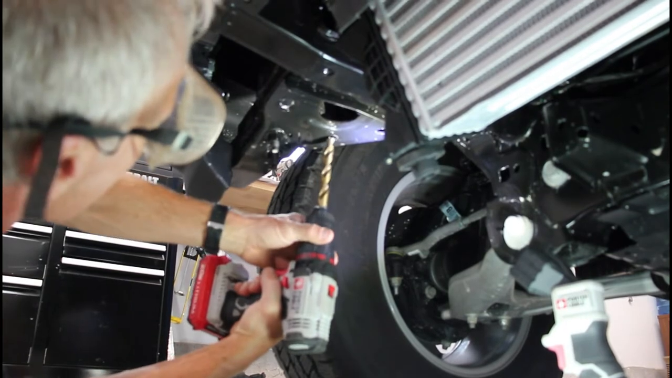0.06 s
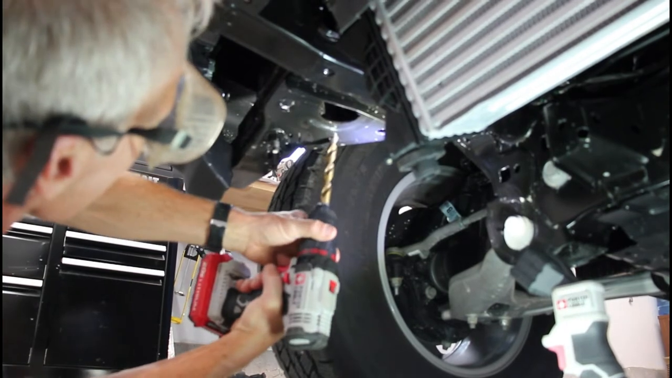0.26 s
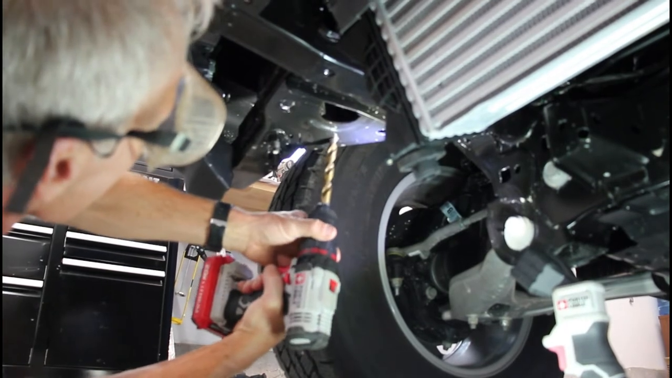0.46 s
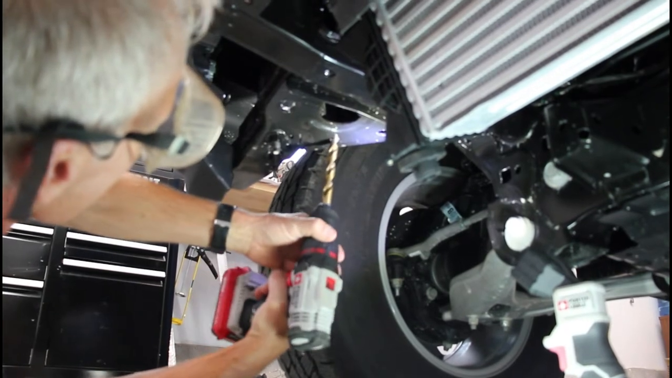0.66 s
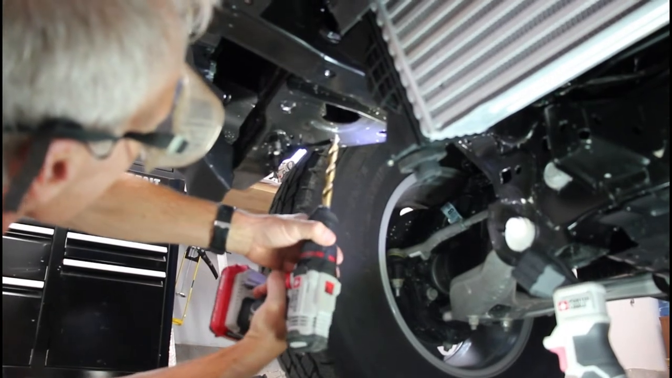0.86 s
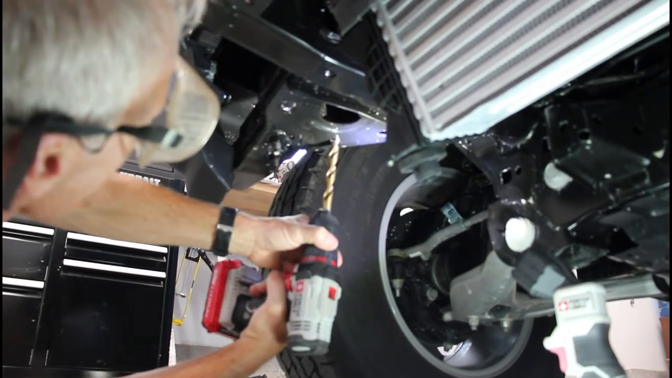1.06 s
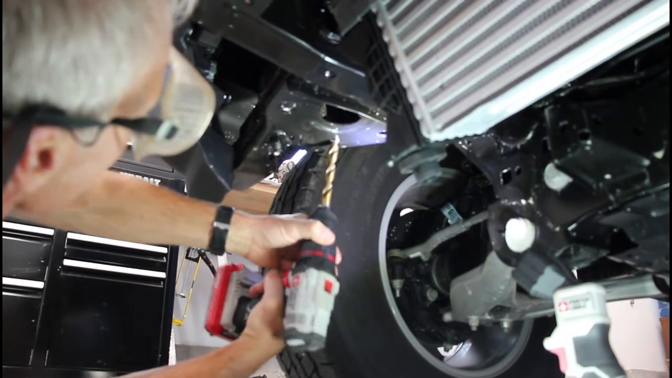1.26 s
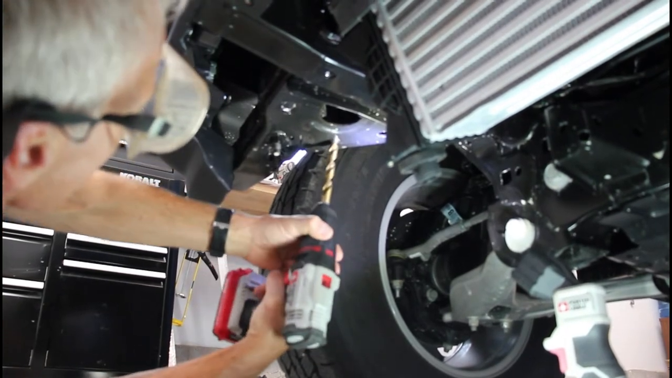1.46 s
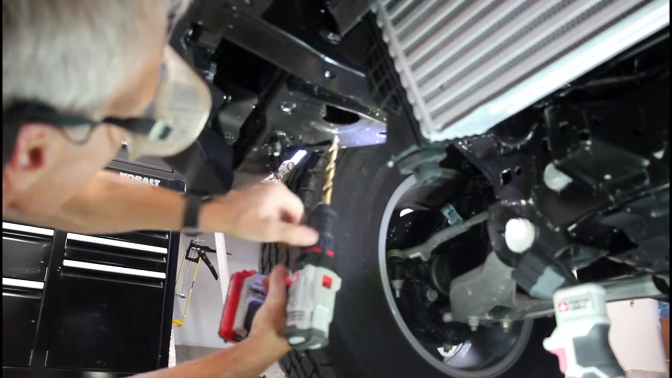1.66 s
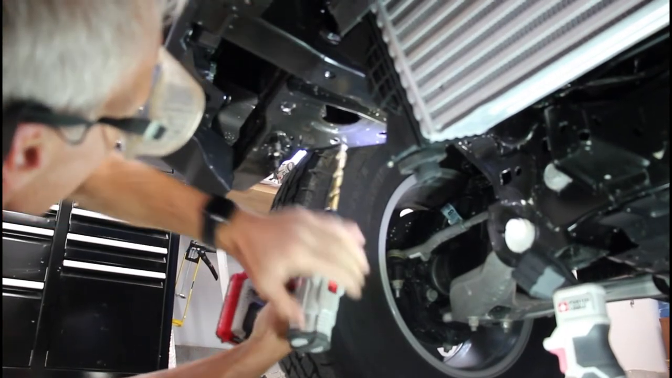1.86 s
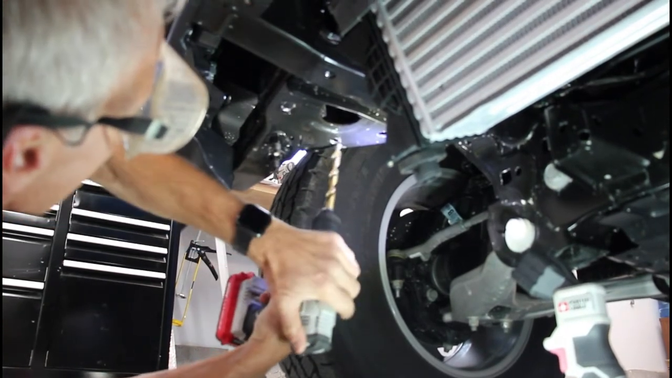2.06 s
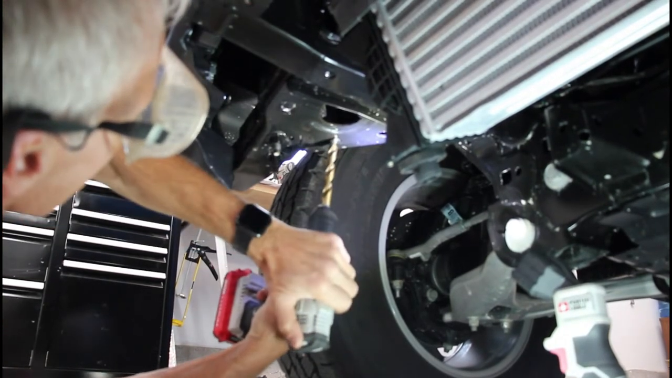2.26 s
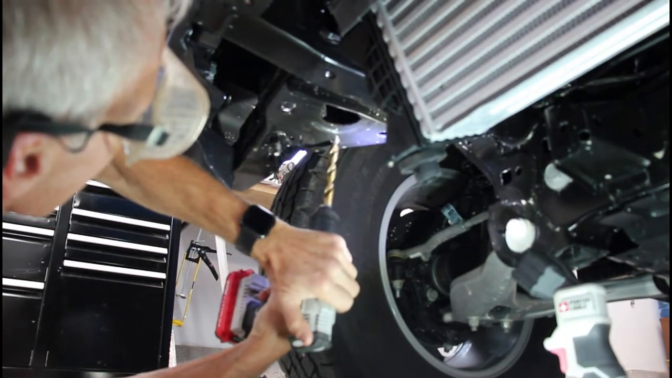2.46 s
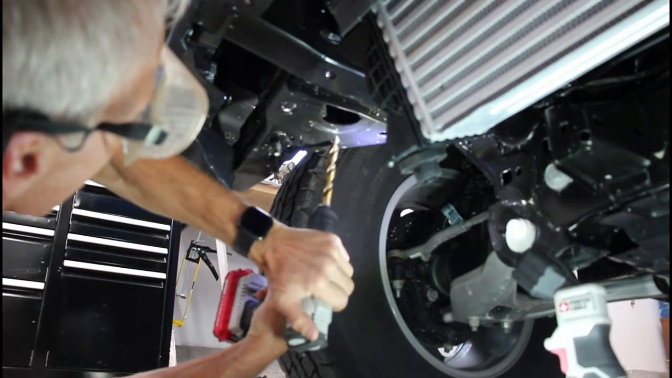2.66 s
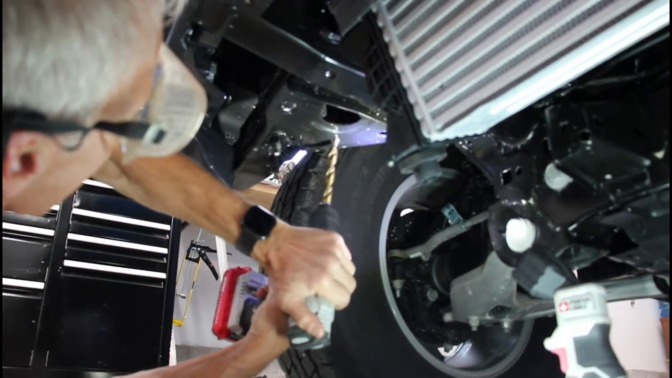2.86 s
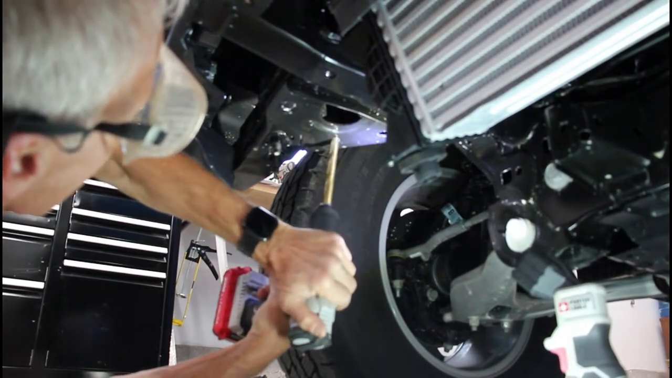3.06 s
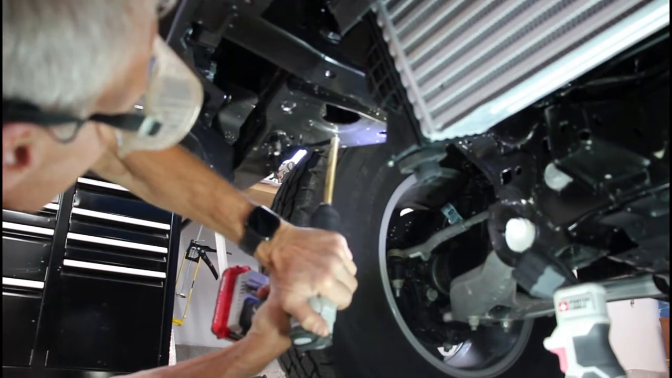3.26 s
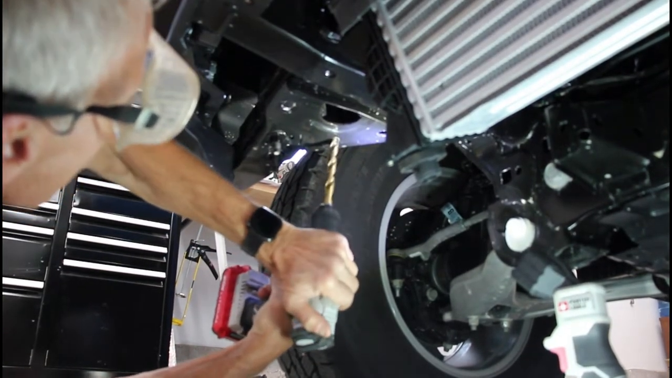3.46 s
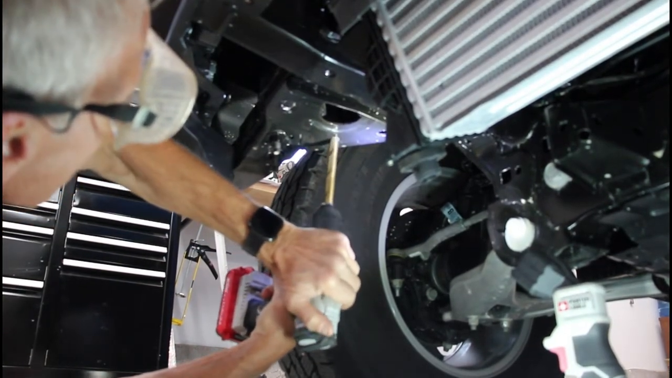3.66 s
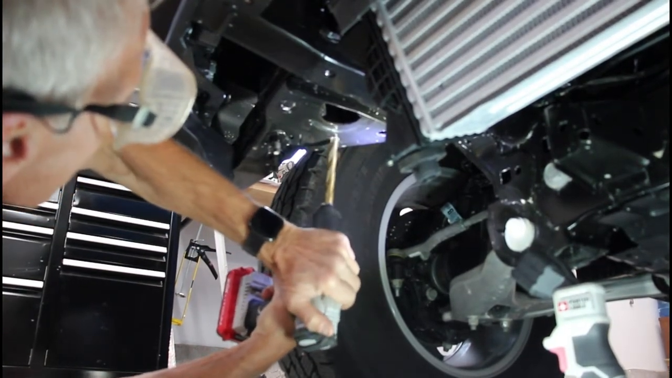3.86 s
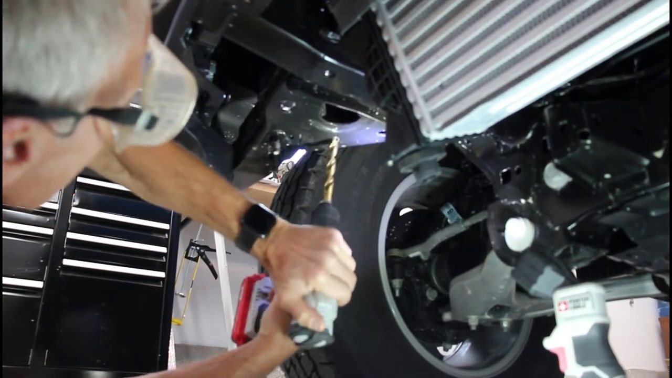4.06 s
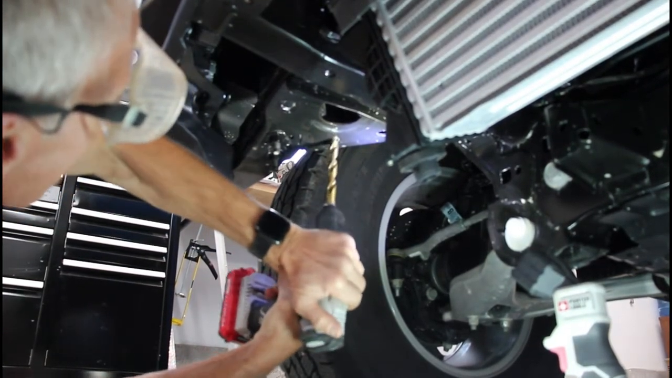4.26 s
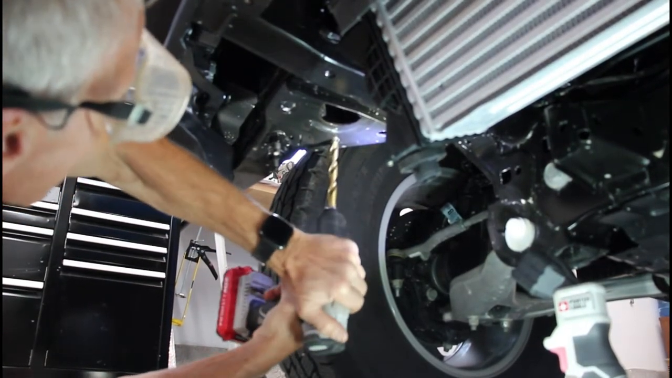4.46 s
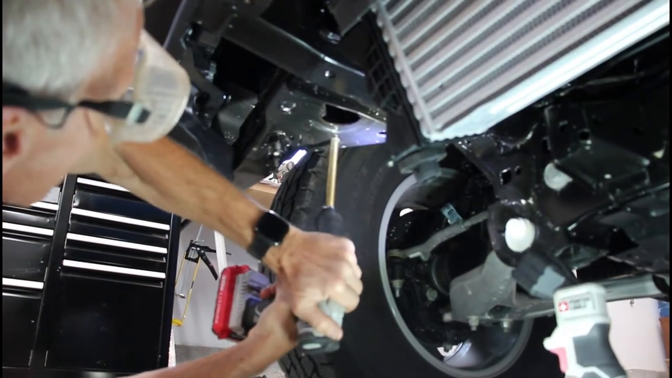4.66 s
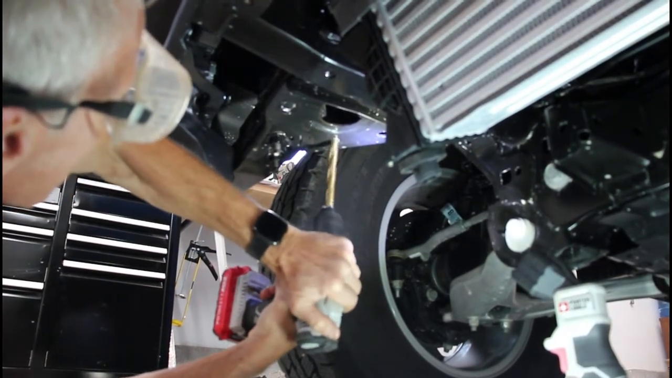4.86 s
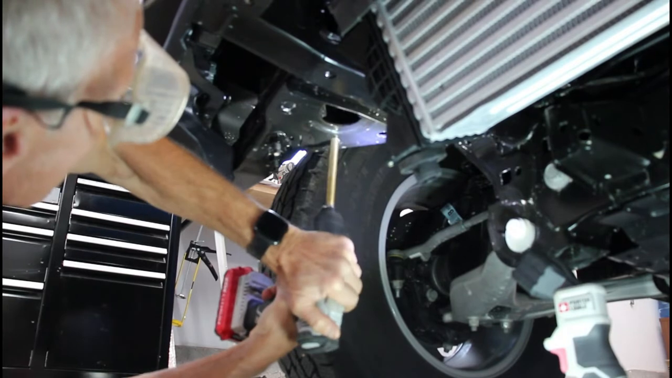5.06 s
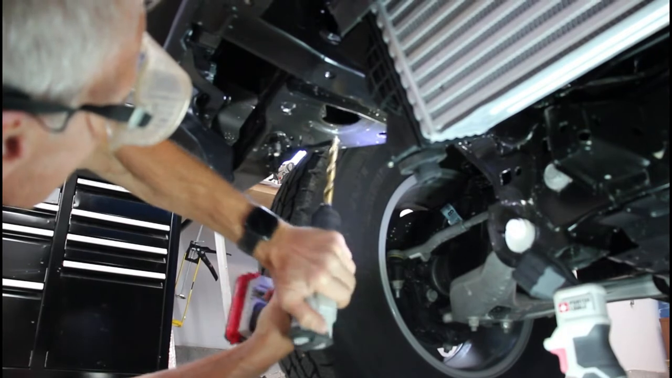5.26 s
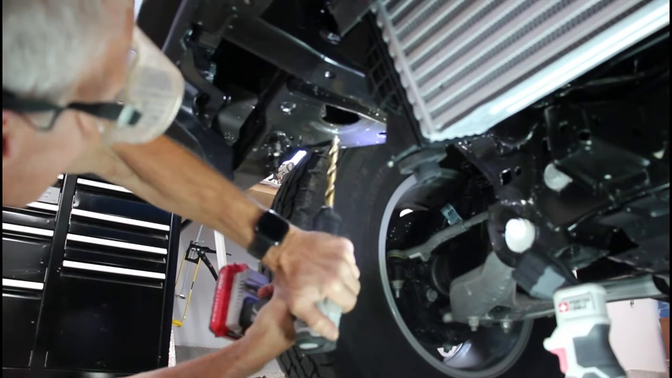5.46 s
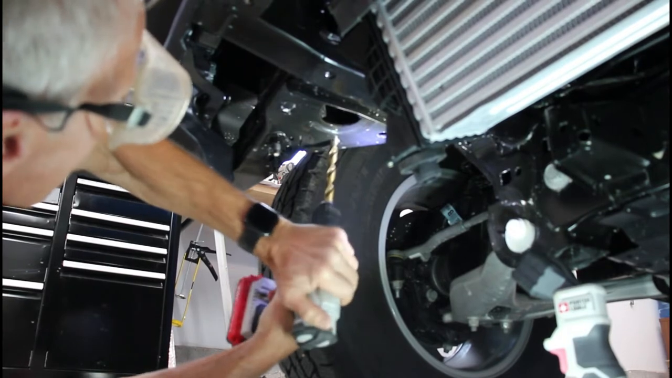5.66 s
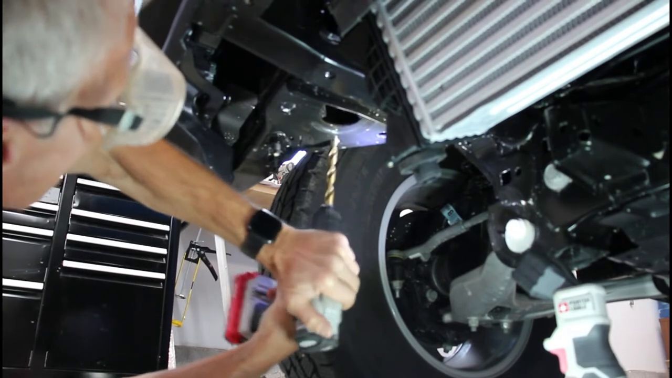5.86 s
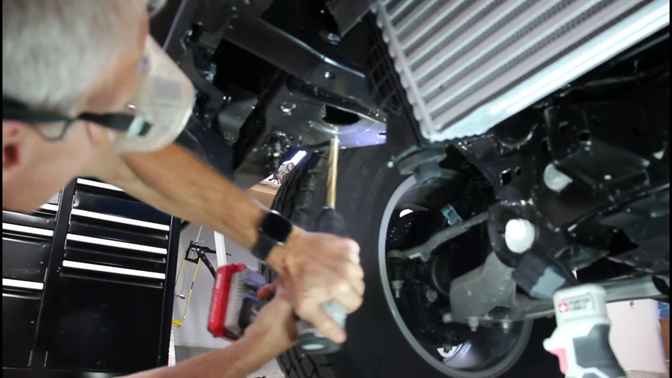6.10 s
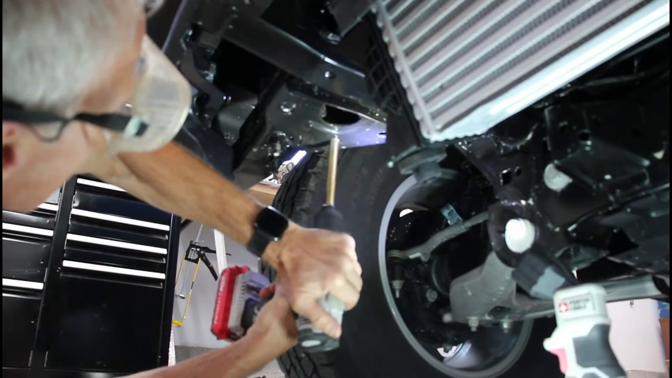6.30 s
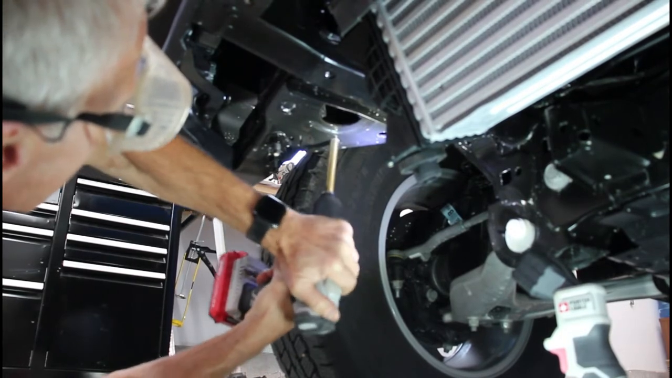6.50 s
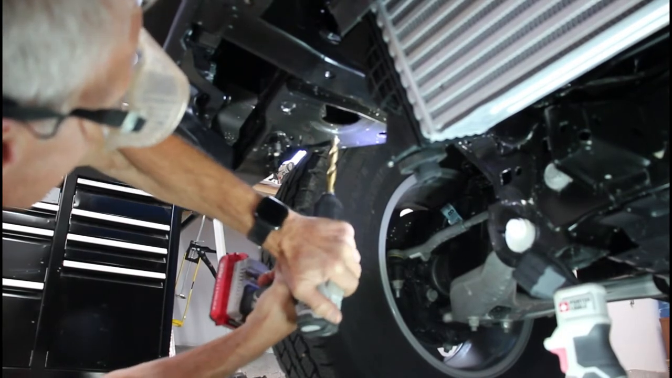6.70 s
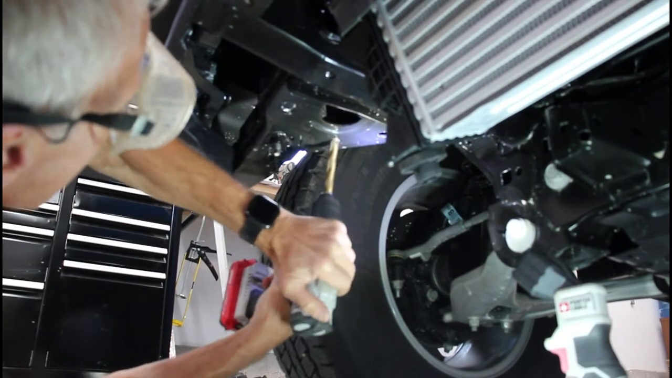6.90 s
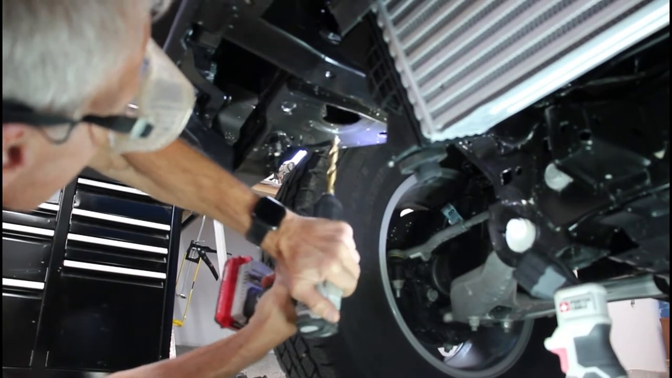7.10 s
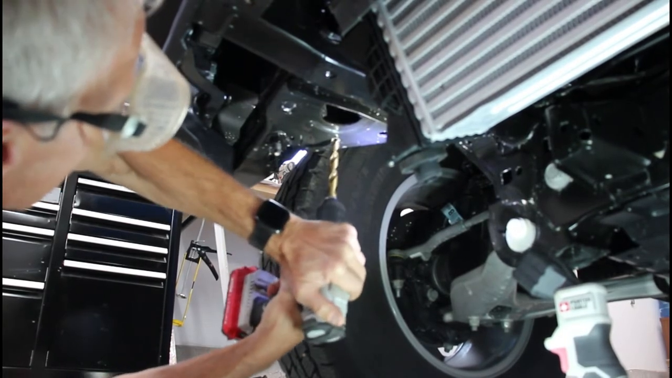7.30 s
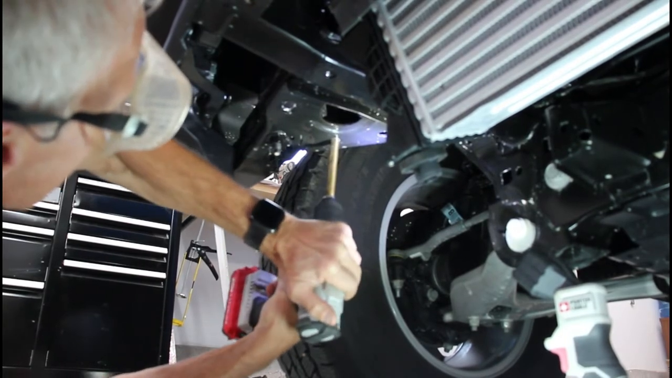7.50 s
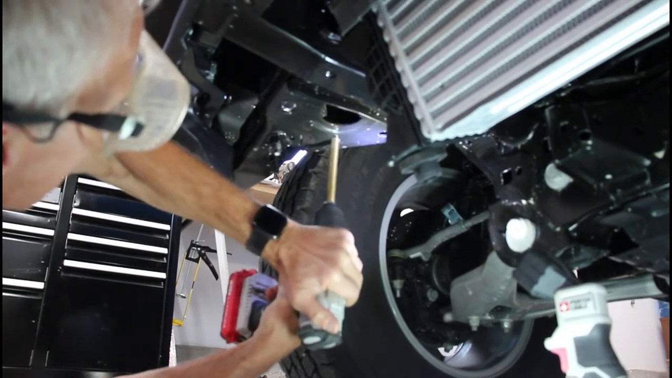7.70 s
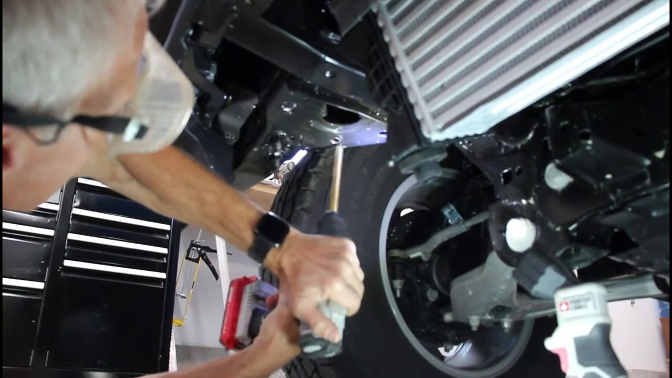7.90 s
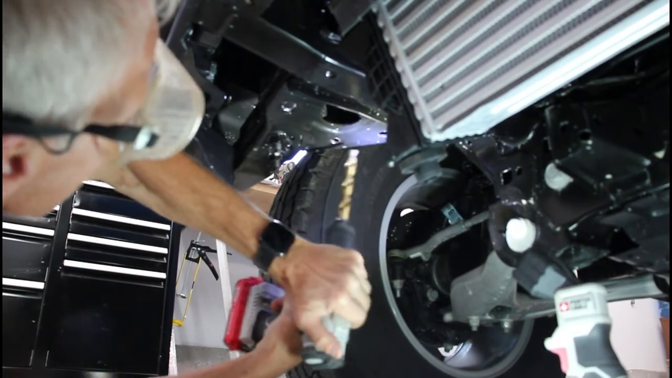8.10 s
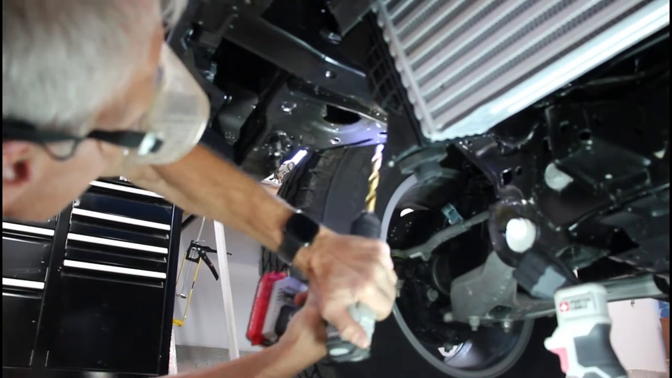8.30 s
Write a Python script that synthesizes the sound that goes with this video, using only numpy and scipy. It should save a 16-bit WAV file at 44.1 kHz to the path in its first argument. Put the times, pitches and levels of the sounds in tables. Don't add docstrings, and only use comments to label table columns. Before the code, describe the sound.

Knocks and scrapes seat a drill bit on a steel bracket, then it grinds and squeals through the metal in short bursts, close up in a garage.

```python
import sys
import numpy as np
from scipy import signal
from scipy.fft import rfft, irfft, next_fast_len
from scipy.io import wavfile
from scipy.ndimage import uniform_filter1d

SR = 44100
rng = np.random.default_rng(int(sys.argv[2]) if len(sys.argv) > 2 else 0)


def persist_wave(psi):
    counts = np.round(np.clip(psi, -1, 1) * 32767).astype(np.int16)
    wavfile.write(sys.argv[1], SR, np.atleast_2d(counts).T)


def ratio_of_db(decibels):
    return 10 ** (np.asarray(decibels, float) / 20)


N = 367794
T = np.arange(N) / SR
STEPS = np.arange(0, N, 20) / SR

# frequency in Hz, density in dB per Hz.
HUM_SPECTRUM = [(8, -1.5), (16, -9), (30, -15.5), (60, -24.5), (150, -31), (230, -33), (400, -37.5),
                (1370, -44), (6500, -55), (12000, -58.5), (15000, -66)]
HUM_DB, HUM_DUCK = -31.5, 0.039
LAMP_HZ, LAMP_DB = 12931.5, -44.5
REST_DB, KNEE_DB, QUICK_S, QUICK_SHARE, SLOW_S, SLOW_SHARE = 3, -35, 0.0568, 0.48, 2.75, 1.51
# time in seconds, share of full scale.
CEILING = [(0, 0.61), (6.12, 0.57), (6.16, 0.46), (8.34, 0.61)]

# start in seconds, length in seconds, scrape dB, thud dB.
FUMBLE = [(0.255, 0.0086, -23.5, -32), (0.537, 0.11, -36.5, -46.5), (.875, 0.01311, -49, -51),
          (1.22, 0.16, -41.5, -36), (1.415, 0.023, -25.5, -29), (1.5, 0.084, -45, -72),
          (1.704, 0.05, -33.5, -52), (1.747, 0.042, -22, -37), (1.862, .025, -30, -59),
          (1.884, 0.003, -7, -20.5), (1.926, 0.052, -43, -26), (2.016, 0.054, -30, -45),
          (2.094, 0.008, -16, -28), (2.251, 0.086, -36, -33), (2.283, 0.009, -18.5, -28),
          (2.546, 0.011, -23, -25.5), (5.556, 0.006, -20.5, -42.5)]
# start in seconds, length in seconds, level in dB.
SWISH = [
    (.55, 0.1, -43),
    (1.52, 0.093, -40),
]
# time in seconds, peak in dB, ring in Hz, brightness from 0 to 1.
KNOCKS = [(0.259, -18, 1970, 0.3), (0.546, -2, 2026, 0.98), (0.881, -28, 2750, 0.76),
          (1.257, -25.5, 1980, 0), (1.348, -24.5, 1940, 0), (1.421, -20.5, 1060, 0.26),
          (1.517, -15, 1770, 0.91), (1.552, -18, 3760, 0.97), (1.754, -13, 1920, 0.45),
          (1.887, -29, 3570, 0.4), (2.096, -15, 1953, 0.3), (2.281, -17.5, 1990, 0.42),
          (2.552, -18, 1970, 0.4), (3.732, -8, 3335, 1), (3.962, -21, 3880, 0.54), (4.181, -25, 3870, 0.25),
          (4.209, -34, 4000, 0.3), (4.358, -37.5, 3930, 0.08), (5.189, -18, 4051, 0.46),
          (5.559, -19, 3163, 0.26), (5.744, -16, 5000, 0.7), (5.935, -35, 3980, 0.07),
          (6.805, -13, 3030, 0.86), (7.985, 9, 3190, 0.97), (7.997, -1, 3830, 0.86),
          (8.05, -20, 4900, 0.95)]
# frequency in Hz, width in Hz, level in dB.
BRACKET = [(870, 190, -9), (1210, 16, -12.5), (1554, 12, -5.5), (1950, 45, -5.5), (2560, 23, -9),
           (2770, 39, -10), (3280, 30.65, -9), (3680, 17, -7.5), (3830, 26, -12), (4760, 18, -15.5),
           (5120, 49, -9), (5337.7, 20.22, -7.5), (5780, 18, -17), (6960, 29, -19.5)]
HELD = 0.76

# start in seconds, length in seconds, level in dB, change over the pull in dB.
WHINE = [(2.644, 0.13, -12, 1.5), (3.005, 0.32, -12, -8.5), (3.545, 0.25, -14, -12.5),
         (3.794, 0.087, -19.5, 0.5), (3.957, 0.12, -19.5, 0), (4.079, 0.093, -24.5, 8),
         (4.154, 0.019, -19, 2.5), (4.69, .14, -26, 8), (4.903, 0.05, -21.5, 2), (5.055, 0.021, -27, -4),
         (5.177, 0.0451, -27.5, 4), (5.353, .009, -21.5, -4), (5.694, 0.010632, -22.5, -2)]
WHINE_HZ, SURGE_DB, SURGE_S = 3893.8, 3., 0.025
# multiple of the whine, level in dB.
OVERTONES = [(2, -40), (3, -37.5), (4, -47.5)]
OVERTONES_FROM_S = 2.8
# time in seconds, armature slot tone in Hz, its level in dB, shaft level in dB.
FREE_SPIN = [(7.66, 3480, -25, -48), (7.7, 3717, -27.5, -50), (7.758, 3994, -29, -48),
             (7.84, 4140, -28.5, -43.5), (7.93, 4175, -26, -43), (7.965, 4175, -24.5, -38),
             (7.99, 4080, -26, -46)]
SLOTS = 12
# start in seconds, length in seconds, level in dB, first Hz, last Hz.
GROAN = [(3.115, 0.18, -35, 642, 636), (3.595, 0.1, -33, 525, 588), (3.69, 0.12, -37, 589, 484),
         (4.74, .07, -38, 646, 552), (4.96, 0.034, -30, 595, 660), (6.31, 0.082, -36.5, 634, 584.1)]

# start in seconds, length in seconds, level in dB, first Hz, last Hz.
SHRIEK = [(5.015, 0.07, -30, 5815, 5780), (6.608, 0.0095, -20, 11600, 11550),
          (6.63, 0.22, -51, 11560, 11400), (6.8, 0.05, -22, 5840, 5970), (6.85, 0.016, -18, 5500, 5480)]
# start in seconds, length in seconds, level in dB, first Hz, last Hz.
DIG = [(2.553, 0.013, -17, 880, 860), (2.674, 0.0074, -22, 640, 584), (2.715, 0.015, -27, 870, 860),
       (2.792, 0.016, -25.5, 870, 880), (2.83, 0.14, -40, 960, 850), (3.01, 0.082, -25.5, 1950, 1973),
       (3.135, 0.034, -26, 1950, 1950), (3.19, 0.036, -21, 2730, 2735), (3.548, 0.012, -21.5, 614.7, 636),
       (3.59, 0.06, -21, 2050, 2130), (3.68, 0.068, -23, 2200, 2020), (3.79, 0.034, -23.5, 1990, 1950),
       (4.0, 0.061, -34, 1880, 1950), (4.18, 0.06, -41, 340, 321), (4.45, 0.022, -20.5, 600, 615.6),
       (4.47, 0.032, -19, 1950, 2084), (4.615, 0.01504, -17, 2690, 2700), (4.715, .02, -19, 2560, 2560),
       (4.78, .03, -23.5, 2099, 2046), (5.072, 0.024, -23, 1950, 2186), (5.27, 0.026, -19.5, 2610, 2510),
       (6.032, 0.0251, -24.5, 511, 526), (6.055, 0.025, -20.5, 1950, 2048), (6.215, 0.023, -10, 2750, 2750),
       (6.283, 0.053, -17, 2600, 2576), (6.51, 0.034, -11, 3250, 3130), (6.825, 0.023, -6.5, 3330, 3391),
       (6.86, 0.023, -16, 3115, 3170), (7.377, 0.012, -12, 2560, 2560), (7.422, 0.024, -10.5, 2330, 2250),
       (7.458, 0.028, -13, 1982, 2203)]
# time in
# seconds, peak in dB, pitch in Hz.
TICKS = [(1.4957, -34, 3632), (1.5166, -31, 3180), (1.551, -25.5, 3440), (1.71, -38.5, 5330),
         (1.8868, -4, 3600), (1.9382, -37, 5040), (2.037, -24, 2600), (2.266, -33, 1960),
         (2.676, -15, 1730), (3.621, -16, 5500), (3.74, -9, 5400), (3.97, -17, 5000), (4.205, -28, 5200),
         (4.285, -44, 4970), (4.475, -16, 5030), (4.66, -15, 5830), (5.019, -13.5, 5840),
         (5.049, -12, 6010), (5.189, -22, 5070), (5.41, -28.5, 5440), (5.557, -16, 4500),
         (5.711, -26, 2970), (5.744, -19, 5370), (5.988, -27, 3300), (6.22, -9.5, 5700), (6.281, 0.5, 5157),
         (6.502, 1, 5487), (6.803, -15, 5770), (6.826, -7.5, 4440), (7.093, -29, 1500), (7.252, -27, 4486),
         (7.425, -2.5, 5058), (7.47, -22, 5514), (7.507, -15, 6264), (7.535, -6, 5517),
         (7.988, -14.5, 3343), (7.997, -4.5, 5400), (8.022, -13, 5010), (8.05, -18.5, 4800)]
# start in seconds, length in seconds, dB, Hz.
GRABS = [(3.04, 0.01716, -16, 3325), (3.195, 0.014, -18, 3330), (3.24, 0.0138, -26, 3300),
         (3.655, 0.013, -13, 3418), (3.73, 0.013, -25, 3310), (3.82, 0.01387, -26, 3300),
         (3.85, .012, -26, 3000), (4.506, 0.0064, -24, 3370), (4.559, 0.015, -10.5, 3376),
         (4.6, 0.018, -7.5, 3300), (4.662, 0.0063, -5.5, 3372), (4.725, 0.013, -21, 3386),
         (4.755, 0.0092, -8, 3300), (4.79, 0.0093, -10.5, 3280), (4.98, 0.011, -6, 3340),
         (5.017, 0.017, -12.5, 2930), (5.047, 0.027, -7.5, 2987), (5.088, 0.00846, -11, 3570),
         (5.265, 0.021617, -20, 3260), (5.325, 0.011, -24, 3396), (6.08, 0.026, -12, 3086),
         (6.325, 0.01434, -15, 3602), (6.801, 0.0046, -5.5, 2900), (6.811, 0.0058, -10, 3040),
         (6.92, 0.012, -25, 3958), (7.143, 0.010306, -6.5, 3369), (7.384, 0.00788, -10.5, 3912),
         (7.669, 0.004089, -18, 3353), (7.676, 0.011, -17.5, 3363)]

# start in seconds, length in seconds, grit level in dB,
# change over the bite in dB, low chatter level in dB.
BITES = [(2.642, 0.16, -28.5, -2.5, -30.5), (3.004, 0.32, -23, -1.5, -28),
         (3.318, 0.02014, -43, -4.5, -25.5), (3.545, .32, -22.5, -7.5, -26.5), (3.959, 0.1, -37.5, -1, -32),
         (4.176, 0.033, -46, -1, -37.5), (4.353, 0.014, -40.5, 1, -41.5), (4.451, 0.48, -19.5, -15, -25),
         (4.872, 0.03989, -41, -7, -34), (4.921, 0.18, -25, -2.5, -29.5), (5.189, 0.09, -38, 9, -35.5),
         (5.255, .1, -29, -2, -27), (5.553, 0.01, -25.5, -3.5, -31), (5.7, 0.039, -43, 1.5, -38.5),
         (5.927, 0.028, -35, -3.5, -42), (5.991, 0.01286, -46, -2, -41), (6.031, 0.063, -21.5, 1.5, -30),
         (6.12, 0.39, -29.5, 3.5, -35), (6.447, 0.022, -20, -5.5, -27), (6.496, 0.091, -19.5, -9.5, -27.5),
         (6.79, 0.01416, -28, 1, -35), (6.815, 0.063, -22, 2, -29.5), (7.088, .15, -32.5, 3, -34),
         (7.356, 0.02, -37, 6, -35), (7.383, 0.2, -23, 2, -29.5), (7.625, 0.35, -31, 5.5, -38.5),
         (7.979, 0.016, -21, 0.5, -34), (8.045, .004, -38, -3, -55)]
FIRST_BITE_S = BITES[0][0]
# start in seconds, length in seconds, level in dB, first Hz, last Hz.
SQUEALS = [(2.655, 0.17, -30.5, 3500, 3560), (3.02, 0.17, -25, 3370, 3300), (3.19, 0.16, -20, 3300, 3240),
           (3.555, 0.21, -18, 3300, 3270), (3.785, 0.068, -17, 3140, 3148), (3.88, 0.22, -33, 3050, 3080),
           (4.455, .09, -17, 3300, 3280), (4.555, 0.13, -21, 3300, 3300), (4.70, .12, -24.5, 3300, 3198),
           (4.83, 0.082, -25.5, 3300, 3264), (4.925, 0.05854, -15.5, 3320, 3300),
           (5.0, .1, -16.5, 3040, 3050), (5.11, 0.14, -21.5, 3000, 3032), (5.255, 0.1, -18.5, 3250, 3160),
           (5.70, 0.069, -39, 3060, 3185), (5.935, 0.026, -37, 2400, 2471),
           (6.045, 0.08601, -18, 3440, 3291), (6.14, 0.039, -15, 3380, 3325),
           (6.178, 0.03, -6.5, 3317, 3300), (6.21, 0.063, -11.5, 3300, 3300), (6.28, 0.02, -6, 3300, 3300),
           (6.31, 0.12303, -21.5, 3300, 3540), (6.465, 0.012, -10, 3330, 3285),
           (6.498, 0.054, -0.5, 2770, 2770), (6.54, 0.044, -7.5, 3040, 3063),
           (6.59, 0.0066, -8.5, 3460, 2974), (6.818, 0.02928, -3.5, 3040, 3139),
           (6.848, 0.037, -7, 2750, 2925), (7.105, 0.019, -10, 3374, 3349),
           (7.172, 0.028, -6.5, 3430, 3354), (7.206, 0.03263, -2.5, 3307, 3300),
           (7.379, 0.03383, -7.5, 3420, 3185), (7.42, 0.039, -4, 2946, 2836),
           (7.465, 0.032, -8.5, 2596, 2844), (7.5, 0.026, -2.5, 3369, 3174), (7.534, 0.084, -1, 3232, 3320),
           (7.62, 0.0088, -14, 3300, 3300), (7.654, 0.011, -2.5, 3370, 3346),
           (7.985, 0.021, -20.5, 3300, 3186)]
# frequency in Hz, width in Hz, level in dB.
STEEL = [(2046, 39, -8.5), (2250, 13, -13), (2560, 36, -1.5), (2750, 10, -6.5), (2873, 22, 4),
         (3040, 19, 5.5), (3230, 66, -2), (3300, 11.5, 5.5), (3420, 41, 6), (3320, 25, 2), (5370, 350, -31)]
# frequency in Hz, density in dB per Hz.
GRIT = [(880, -49), (1500, -15.5), (2230, -12.5), (3300, -12), (3700, -3), (3770, -3), (4100, -6.5),
        (5800, -11), (7400, -21.5), (9750, -29), (16500, -120)]
CHATTER = [(82, -40), (150, -14), (486, -12), (641, -6.5), (780, -6), (1630, -10), (1960, -7.5), (2200, -9),
           (2860, -10.5), (4840, -120)]
FIZZ = [(5500, -46), (7500, -18), (8300, -1.5), (9600, -1), (10500, -2), (14000, -8.5), (15800, -14)]
# frequency in Hz, width in Hz.
RING_OUT = [(2770, 15), (3040, 31), (3330, 55)]
REACH_HZ = 256
# start in seconds, length in seconds, dB, change in dB.
GLOW = [
    (6.599, .19, -28, -0.5),
    (6.889, 0.23, -30.5, -3.5),
]
BITE_IN_DB, BITE_IN_S = 3.5, 0.026
HOP_S, HOP_SHARE = .018, 0.0357
UPPER_HZ, UPPER_DB = 5610, -17.5
OCTAVE_DB, DEEP_OCTAVE_DB, SHALLOW_S, DEEP_S = -39, -21., 5.2, 6.3956
THROUGH_S, THROUGH_DB, THROUGH_FALL = 7.675, -10, 452
SINK_S, SINK_DB, SINK_FALL = 8.0, -2, 350

SNAP_S, QUICK_RISE_S, SOFT_RISE_S = .002, .004, .008
GRIT_SHAPE = (SOFT_RISE_S, 425, -14.5, 36)
CHATTER_SHAPE = (QUICK_RISE_S, 190, -7, 38.4)
SQUEAL_SHAPE = (QUICK_RISE_S, 950, -12.5, 44.5)
SWITCH_SHAPE = (SNAP_S, 2700, -60, 300)
GROAN_SHAPE = (SOFT_RISE_S, 500, -40, 220)
DIG_SHAPE = (SOFT_RISE_S, 940, -40, 200)
SCRAPE_SHAPE = (QUICK_RISE_S, 740, -6, 126)
THUD_SHAPE = (SOFT_RISE_S, 148, -5, 38)
SHRIEK_SHAPE = (QUICK_RISE_S, 710, -30, 197)
GRAB_SHAPE = (QUICK_RISE_S, 870, -40, 200)
FILL_S = 0.091
EARLY_RING_DB, EARLY_UNTIL_S = 5, 3.95


def evened(x):
    return x / np.sqrt(np.mean(x ** 2) + 1e-20)


def noise():
    return rng.standard_normal(N)


def wobble(size):
    return evened(uniform_filter1d(uniform_filter1d(noise(), size), size))


def sine(hz):
    return np.sqrt(2) * np.sin(2 * np.pi * np.cumsum(hz) / SR)


def column(rows, index, off=-120.):
    rows = np.array(rows, float)
    out = np.full(N, off)
    on = (T >= rows[0, 0]) & (T < rows[-1, 0] + .006)
    out[on] = np.interp(T[on], rows[:, 0], rows[:, index])
    return out


def level(rows, index):
    return uniform_filter1d(ratio_of_db(column(rows, index)), size=90)


def glide(rows):
    rows = np.array(rows)
    latest = np.maximum(np.searchsorted(rows[:, 0], T) - 1, 0)
    start, length, _, first, last = rows[latest].T
    return first + (last - first) * np.clip((T - start) / length, 0, 1)


def shaped(start, length, db, shape, catch_db=0., catch_s=.01, change_db=0.):
    rise_s, fall, ring_db, ring_fall = shape
    start, length, db, change_db = (np.reshape(v, (-1, 1)) for v in (start, length, db, change_db))
    since = np.maximum(STEPS - start, 0)
    after = np.maximum(since - length, 0)
    hold_db = db + change_db * np.minimum(since / length, 1) + catch_db * np.exp(-since / catch_s)
    hold = np.minimum(since / rise_s, 1) * ratio_of_db(hold_db)
    early = (start < EARLY_UNTIL_S) * (start > FIRST_BITE_S - .01)
    filled = 1 - np.exp(-length / FILL_S)
    ring = (after > 0) * filled * ratio_of_db(ring_db + EARLY_RING_DB * early - ring_fall * after) ** 2
    power = hold ** 2 * (ratio_of_db(-fall * after) ** 2 + ring)
    return np.interp(T, STEPS, np.sqrt(power.sum(0)))


def colour(x, points):
    f, db = np.transpose(points)
    size = next_fast_len(N)
    hz = np.fft.rfftfreq(size, 1 / SR)
    gain = ratio_of_db(np.interp(np.log(hz + 1), np.log(f + 1), db))
    return evened(irfft(rfft(x, size) * gain, size)[:N])


def resonate(x, hz, width):
    r = np.exp(-np.pi * abs(width) / SR)
    if np.ndim(hz) == 0:
        return 2 * signal.lfilter([1 - r], [1, -r * np.exp(2j * np.pi * hz / SR)], x).real
    turn = np.exp(2j * np.pi * np.cumsum(hz) / SR)
    return 2 * (turn * signal.lfilter([1 - r], [1, -r], x * turn.conj())).real


def band(x, hz, width, outer):
    return evened(resonate(resonate(x, hz, width), hz, outer))


def body(x, modes, patchy_db):
    total = np.zeros(N)
    for hz, width, db in modes:
        flare = ratio_of_db(db + patchy_db * wobble(size=500))
        total += flare * resonate(x, hz, width) / np.sqrt(abs(width))
    return evened(total)


def chips(per_s, spread_db):
    size = ratio_of_db(spread_db * np.minimum(rng.exponential(1, N), 5))
    return size * (rng.random(N) < per_s / SR) * noise()


def sung(rows, width, shape):
    return shaped(*np.transpose(rows)[:3], shape) * band(noise(), glide(rows), width, 3 * width)


def background(loud):
    hum = ratio_of_db(HUM_DB) * colour(noise(), HUM_SPECTRUM)
    hiss = ratio_of_db(-54.5) * rng.standard_normal((2, N))
    lamp = ratio_of_db(LAMP_DB) * sine(np.full(N, LAMP_HZ))
    loud_db = 10 * np.log10(abs(uniform_filter1d(loud ** 2, size=900)) + 1e-9)
    over = np.maximum(loud_db - KNEE_DB, 0)
    quick, slow = (signal.lfilter([1 / (s * SR)], [1, 1 / (s * SR) - 1], over) for s in (QUICK_S, SLOW_S))
    air = hum * ratio_of_db([[-.2], [.2]]) * ratio_of_db(-HUM_DUCK * slow) + hiss + lamp
    return ratio_of_db(REST_DB - QUICK_SHARE * quick - SLOW_SHARE * slow) * air


def garage(x, t60):
    t = np.arange(SR // 2) / SR
    taps = rng.choice([-1., 1.], len(t)) * (rng.random(len(t)) < .05) * (t > .006)
    low = signal.lfilter([.35], [1, -.65], taps)
    tail = low * ratio_of_db(-60 * t / t60) + (taps - low) * ratio_of_db(-60 * t / (0.14 * t60))
    return signal.fftconvolve(x, tail / np.linalg.norm(tail))[:N]


def fumble():
    rub = chips(6000, 2.3)
    held = [(hz, HELD * width, db) for hz, width, db in BRACKET]
    rasp = colour(rub, [(300, -1.5), (900, 9.0), (4000, 1.5), (8000, -23), (16000, -66)])
    scrape = ratio_of_db(-7.5) * body(rub, held, patchy_db=5.5) + ratio_of_db(-2.5) * rasp
    thud = colour(rub, [(70, -15.0), (170, 4.0), (400, 1.5), (800, -16.0), (1500, -56)])
    boom = evened(resonate(rub, 180.0, 24.7))
    thud = ratio_of_db(-4.5) * thud + ratio_of_db(-6.5) * boom
    start, length, scrape_db, thud_db = np.transpose(FUMBLE)
    out = shaped(*np.transpose(SWISH), SHRIEK_SHAPE) * evened(np.diff(rub, prepend=0))
    out += shaped(start, length, scrape_db, SCRAPE_SHAPE) * scrape
    return out + shaped(start, length, thud_db, THUD_SHAPE) * thud


def knocks(t60=0.07):
    own, dull, bright = np.zeros((3, N))
    t = np.arange(4000) / SR
    for s, db, hz, bare in KNOCKS:
        bare = np.clip(bare, 0, 1)
        blow = ratio_of_db(db - 60 * t / t60) * rng.standard_normal(len(t))
        span = slice(round(s * SR), round(s * SR) + len(t))
        own[span] += ratio_of_db(21.5) * (1 - bare) * resonate(blow, hz, 87.0)
        dull[span] += (1 - bare) * blow
        bright[span] += bare * blow
    ring = sum(ratio_of_db(db) * resonate(dull, hz, 1.4 * width) for hz, width, db in BRACKET)
    thin = signal.butter(2, [300, 6500], "bandpass", fs=SR, output="sos")
    crisp = signal.butter(2, [2500, 9000], "bandpass", fs=SR, output="sos")
    return signal.sosfilt(thin, own + ratio_of_db(17.5) * ring) + ratio_of_db(-24.5) * signal.sosfilt(crisp, bright)


def motor():
    flutter = ratio_of_db(0.93 * wobble(size=150))
    edges = sum(ratio_of_db(db) * sine(np.full(N, k * WHINE_HZ)) for k, db in OVERTONES)
    tone = sine(np.full(N, WHINE_HZ)) + edges * np.where(T > OVERTONES_FROM_S, 1, ratio_of_db(-9.0))
    start, length, whine_db, change_db = np.transpose(WHINE)
    fresh = np.append(True, start[1:] > (start + length)[:-1])
    surge_db = SURGE_DB * fresh[:, None]
    whine = shaped(start, length, whine_db, SWITCH_SHAPE, surge_db, SURGE_S, change_db) * flutter * tone
    groan_hz = glide(GROAN) * (1 + 0.0126 * wobble(size=600))
    groan = shaped(*np.transpose(GROAN)[:3], GROAN_SHAPE) * ratio_of_db(3. * wobble(size=700)) * sine(groan_hz)
    slot_hz = column(FREE_SPIN, index=1, off=4000.)
    slot = level(FREE_SPIN, index=2) * flutter * sine(slot_hz)
    turning = sine(slot_hz / SLOTS) + ratio_of_db(-3.0) * sine(2 * slot_hz / SLOTS)
    return whine + groan + slot + level(FREE_SPIN, index=3) * turning


def fan():
    return ratio_of_db(-39.0) * level(FREE_SPIN, index=2) * colour(noise(), FIZZ)


def shriek():
    return sung(SHRIEK, 60.7, SHRIEK_SHAPE) + ratio_of_db(-2.0) * sung(DIG, 130.0, DIG_SHAPE)


def ticks(t60=0.026):
    out, t = np.zeros(N), np.arange(1500) / SR
    for s, db, hz in TICKS:
        crack = rng.standard_normal(len(t))
        ping = np.sin(2 * np.pi * hz * t) + ratio_of_db(-4.0) * evened(resonate(crack, hz, 900.))
        ping += ratio_of_db(-24.0 - 2275.0 * t) * crack
        decay = ratio_of_db(db - 60 * t / t60) * np.minimum(t / 0.0011, 1)
        out[round(s * SR):][:len(t)] += decay * ping
    return out


def grabs():
    start, length, db, hz = np.transpose(GRABS)
    pitch = glide(np.transpose([start, length, db, hz, hz])) * (1 + 0.01557 * wobble(size=120))
    skirt = band(noise(), pitch, 370.0, 700.)
    mode = ratio_of_db(-0.7) * sine(pitch) + ratio_of_db(-9.0) * skirt + ratio_of_db(-21.0) * sine(2 * pitch)
    return shaped(start, length, db, GRAB_SHAPE) * ratio_of_db(-3.0) * mode


def afterglow(hz):
    near = [np.exp(-((hz - f) / REACH_HZ) ** 2) + .02 for f, _ in RING_OUT]
    modes = sum(n * evened(resonate(noise(), f, width)) for n, (f, width) in zip(near, RING_OUT))
    modes = modes / np.sqrt(sum(n ** 2 for n in near))
    return modes + ratio_of_db(-19.5) * colour(modes ** 2, [(3500, -80), (5000, 12), (7000, -13), (8500, -62)])


def grinding(force, biting, rough, stutter):
    grit = force * colour(chips(12000, 2.63 * rough) * stutter, GRIT)
    fizz = ratio_of_db(-11.5) * force * biting * colour(chips(12000, 0.53) * stutter, FIZZ)
    chip_hz = 9300 * (1 + 0.051 * wobble(size=900))
    return grit + fizz + ratio_of_db(0.5) * resonate(fizz, chip_hz, 440.0)


def chatter(biting, stutter):
    start, length, _, change_db, low_db = np.transpose(BITES)
    sag_db = 0.87 * change_db - 1.5
    bounce = shaped(start, length, low_db, CHATTER_SHAPE, BITE_IN_DB, BITE_IN_S, sag_db)
    sink = ratio_of_db(np.clip(SINK_FALL * (SINK_S - T), SINK_DB, 0))
    return bounce * colour(chips(5000, 1.0 * biting) * stutter, CHATTER) * sink


def squeal(biting, stutter):
    hz = uniform_filter1d(glide(SQUEALS), size=60)
    ragged = np.clip((3330 - hz) / 300, .12, 1)
    hops = noise()[np.cumsum(rng.random(N) < 1 / (HOP_S * SR))]
    hz = hz * (1 + 0.013 * wobble(size=200) + HOP_SHARE * biting * ragged * hops)
    loud = shaped(*np.transpose(SQUEALS)[:3], SQUEAL_SHAPE)
    loud = loud * ratio_of_db(np.clip(THROUGH_FALL * (THROUGH_S - T), THROUGH_DB, 0))
    locked = np.clip(loud / ratio_of_db(-7.5), 0, .93 - 0.35 * ragged)
    scrub = noise() * stutter

    pure = ratio_of_db(-1.5 + 2.9 * wobble(size=300)) * (1 - ragged) ** 2 * sine(hz)
    narrow = evened(band(scrub, hz, 83.0, 250.0) + pure)
    plate = colour(body(scrub, STEEL, patchy_db=4.5), [(900, -34), (1900, -1.5), (6900, -13.5), (8500, -47)])
    glow = afterglow(hz)
    broad = biting * (band(scrub, hz, 465.0, 850.0) + ratio_of_db(5.0) * biting * plate)
    broad += (1 - biting) * (band(scrub, hz, 465.0, 850.0) + ratio_of_db(5.0) * biting * plate + ratio_of_db(-4.) * glow)
    flare = biting * np.sqrt(ragged) * ratio_of_db(UPPER_DB + 5.1 * wobble(size=600))
    upper = flare * band(scrub, UPPER_HZ, 250., 400.)
    octave_db = np.interp(T, [SHALLOW_S, DEEP_S], [OCTAVE_DB, DEEP_OCTAVE_DB])
    octave = biting * ratio_of_db(octave_db) * band(scrub, 2 * hz, 300., 450.)
    ring = loud * (locked * narrow + (1 - locked) * ratio_of_db(-4.0) * broad + octave + upper)

    lit, held, glow_db, sag_db = np.transpose(GLOW)
    return ring + shaped(lit, held, glow_db, DIG_SHAPE, change_db=sag_db) * glow


def cutting():
    start, length, grit_db, change_db, _ = np.transpose(BITES)
    force = shaped(start, length, grit_db, GRIT_SHAPE, change_db=change_db)
    biting = np.clip(force / ratio_of_db(-31.5), 0, 1)
    rough = biting * np.where(T < THROUGH_S, 1, .3)
    stutter = ratio_of_db(rough * (1.57 * wobble(size=200) + 1.9 * wobble(size=900)))
    steel = grinding(force, biting, rough, stutter) + chatter(biting, stutter)
    return steel + squeal(biting, stutter) + grabs()


def overload(x):
    top = np.interp(T, *np.transpose(CEILING))
    return np.clip(x, -top * 1.005, top)


def scene():
    tones, hands, snaps = motor() + shriek(), knocks() + fumble(), ticks()
    room = ratio_of_db(-19.0 + 3.2 * wobble(size=1200)) * garage(tones, t60=0.99)
    room += ratio_of_db(-15.0) * garage(hands + snaps, t60=0.77)
    cut = T > FIRST_BITE_S
    drill = overload(cutting() + fan() + tones + cut * snaps)
    return drill + hands + ~cut * snaps + room + background(drill + ratio_of_db(-17.0) * hands)


def band_limit(x):
    return signal.sosfilt(signal.butter(12, 16430, fs=SR, output="sos"), x)


def record(dry):
    edge = signal.firwin(301, 15800, fs=SR)
    wet = signal.oaconvolve(dry + .007, edge[None], "same")
    return band_limit(np.clip(wet, -1, 1))


dry = scene()
out = record(dry)
persist_wave(out)
```